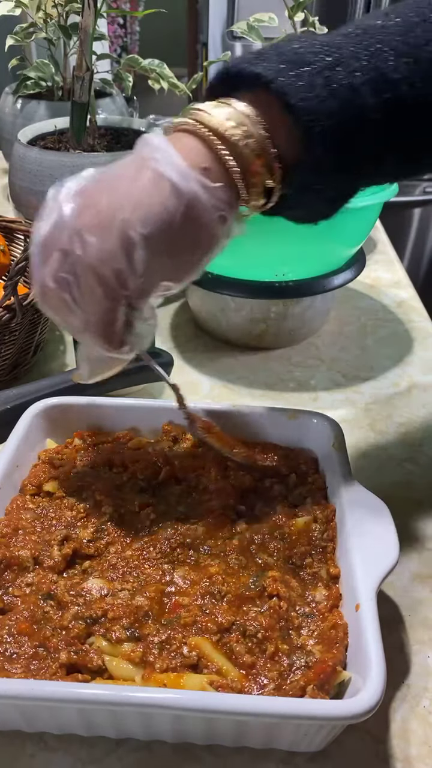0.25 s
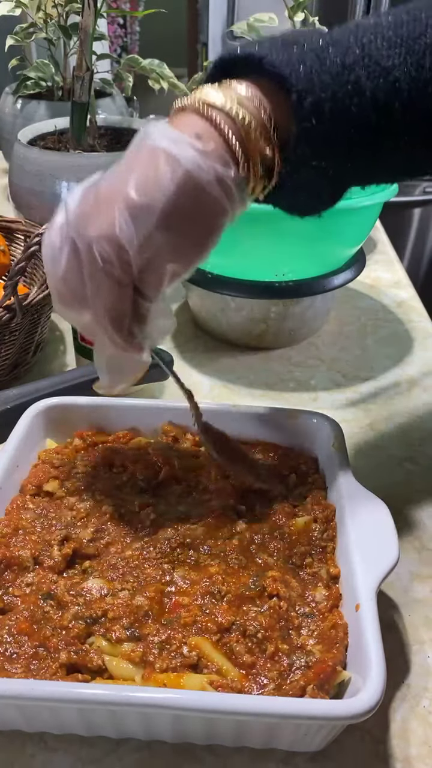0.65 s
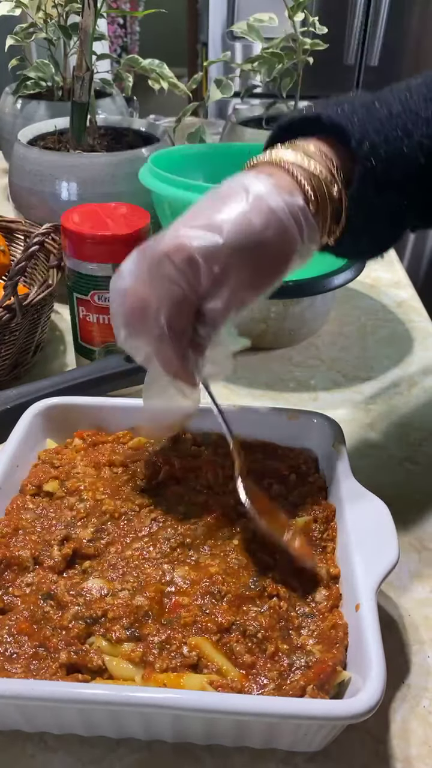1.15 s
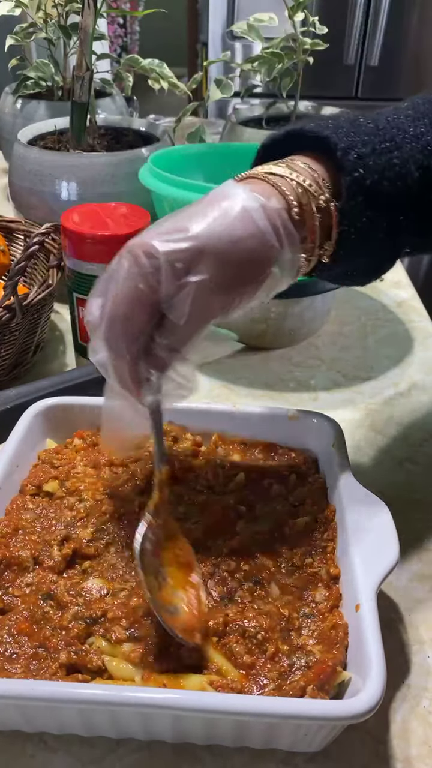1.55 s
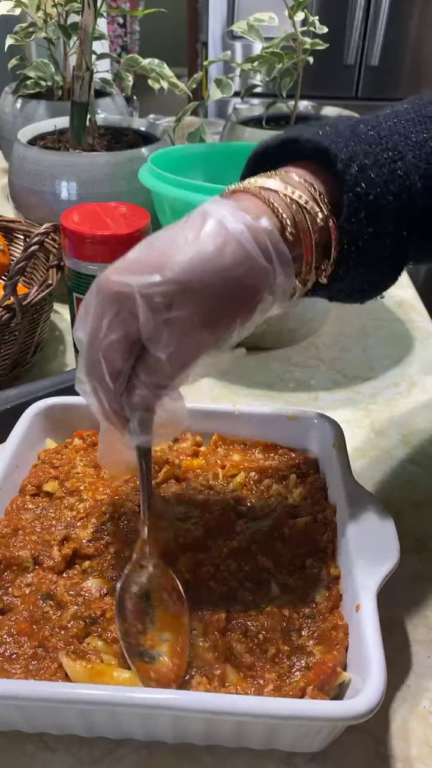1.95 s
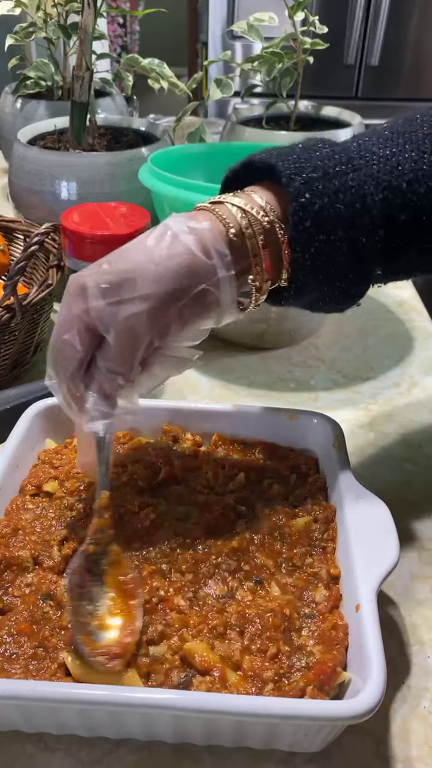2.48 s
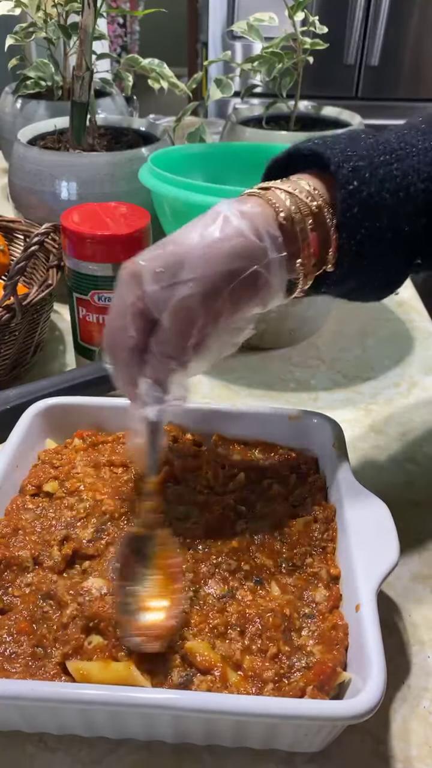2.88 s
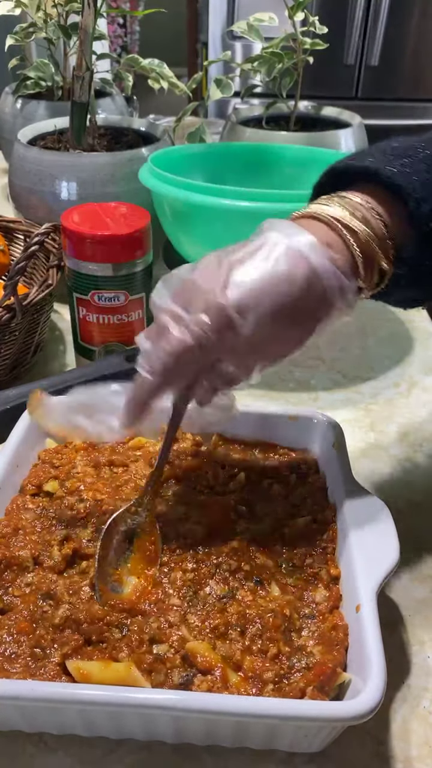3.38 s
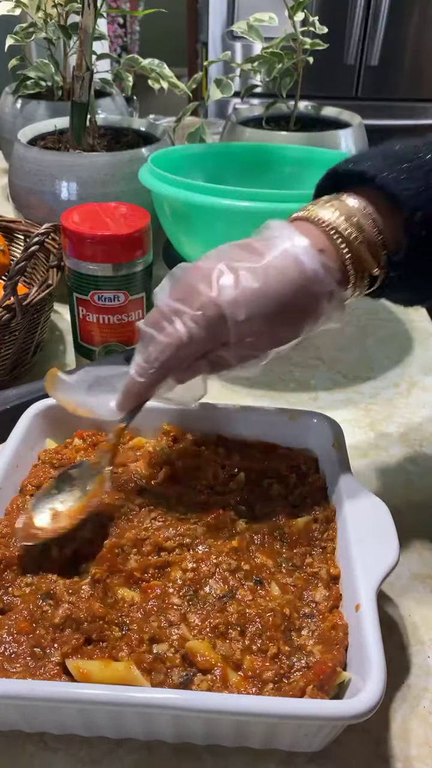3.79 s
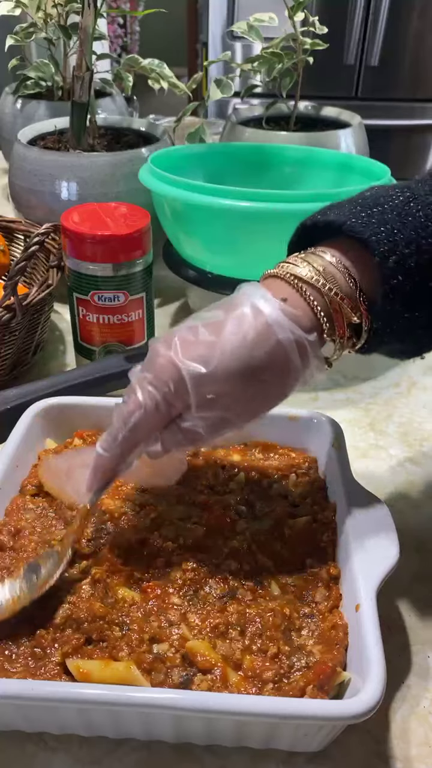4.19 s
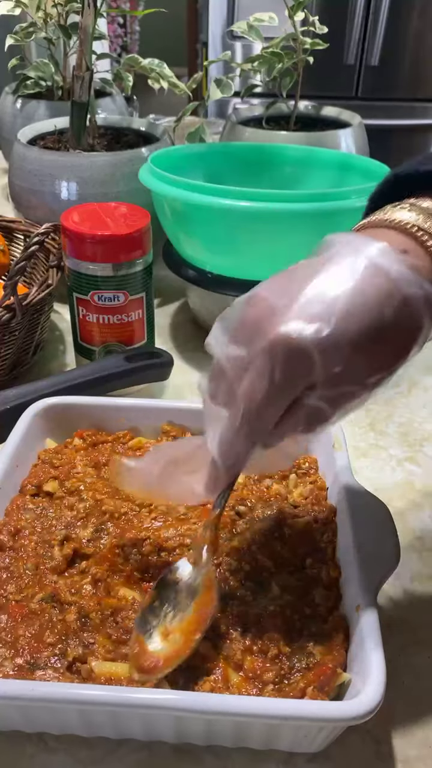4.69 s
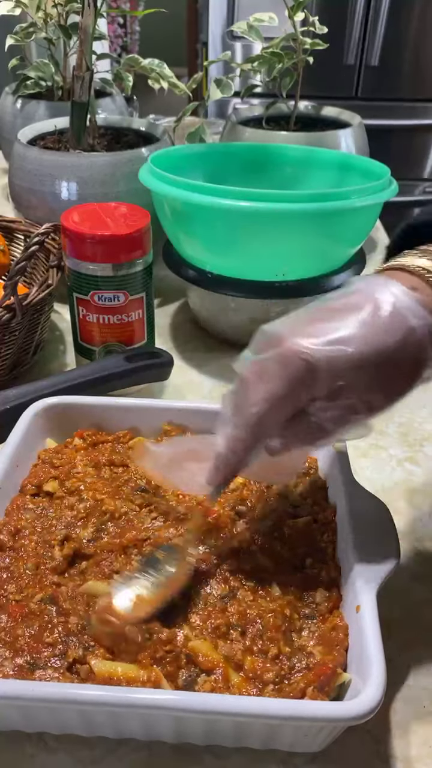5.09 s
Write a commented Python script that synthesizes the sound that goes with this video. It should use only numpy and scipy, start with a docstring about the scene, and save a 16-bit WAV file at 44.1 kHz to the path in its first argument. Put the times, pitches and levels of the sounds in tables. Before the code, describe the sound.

A metal spoon clinks on a ceramic dish, then pats thick sauce with soft dull thuds while a thin plastic glove rustles in a kitchen.

```python
"""A steel spoon spreads sauce in a ceramic dish on a counter, before one microphone in a small hard-walled kitchen.
Low room hush and mains hum run throughout. At once the spoon clinks on the rim, ringing the dish wall's modes,
and pats the filling: soft pushes thud dish and counter and the sauce murmurs after. Soon it grazes along the rim,
noise fed into the same modes. Then a thin plastic glove rustles, snaps over hiss, and sauce and glove tick in short
decaying sines. Pats go on almost to the end; a clink comes at 1.7 s, clinks and grazes again after 3.8 s."""
import sys
import numpy as np
from scipy import signal
from scipy.fft import rfft, irfft, next_fast_len
from scipy.io import wavfile
from scipy.ndimage import map_coordinates

SR = 44100
rng = np.random.default_rng(int(sys.argv[2]) if len(sys.argv) > 2 else 0)


def unload_audio(sound):
    """Save the sound as a 16-bit wav file, at the path given as the first command line argument."""
    columns = np.transpose(np.atleast_2d(sound))
    # keep every value between -1 and 1, then stretch to whole-number steps
    steps = np.round(np.clip(columns, -1, 1) * 32767)
    wavfile.write(sys.argv[1], SR, steps.astype(np.int16))


N = 235479  # samples in the scene
SPAN = 32768  # samples in one struck or grazed sound, before it is laid on the track


def amp(db):
    """dB to gain."""
    return 10 ** (np.asarray(db) / 20)


def unit(x):
    """Scaled to rms 1."""
    return x / np.sqrt(np.mean(x ** 2) + 1e-20)


def along(points, hz):
    """Values at hz, read between (Hz, value) points on a log frequency axis."""
    f, v = np.transpose(points)
    return np.interp(np.log(hz + 1), np.log(f + 1), v)


def filtered(x, response):
    """x times a complex response of frequency."""
    m = next_fast_len(len(x) + SR // 2)
    hz = np.fft.rfftfreq(m, 1 / SR)
    return irfft(rfft(x, m) * response(hz), m)[:len(x)]


def shaped(x, spectrum):
    """x filtered by a spectrum of (Hz, dB) points and scaled to rms 1."""
    return unit(filtered(x, lambda hz: amp(along(spectrum, hz))))


def body(modes, drive_db):
    """Response of a set of resonances in alternating sign, each driven at its own strength."""
    def response(f):
        total = 0
        for k, ((centre, width, db), drive) in enumerate(zip(modes, drive_db)):
            resonance = 1j * f * width / (centre * centre - f * f + 1j * f * width)
            total = total + (-1) ** k * amp(db + drive) * resonance
        return total
    return response


def wobble(rate):
    """A smooth random curve, rate knots a second."""
    knots = rng.standard_normal(int(N * rate / SR) + 4)
    return map_coordinates(knots, [np.arange(N) * rate / SR])


# How long the hard kitchen walls hold a sound. Each row: frequency in Hz, time to fall 60 dB in seconds.
KITCHEN_DECAY = [(100, 0.45), (300, 0.28), (1200, 0.35), (4000, 0.28), (12000, 0.23)]


def in_kitchen(x, wet_db):
    """x plus the walls' answer, which builds up in a few ms and dies at its own speed at each frequency."""
    hz, t, z = signal.stft(rng.standard_normal(SPAN), SR, nperseg=256)
    fall_db = -60 * t / along(KITCHEN_DECAY, hz)[:, None]
    tail = signal.istft(z * amp(fall_db), SR, nperseg=256)[1]
    tail *= 1 - np.exp(-np.arange(len(tail)) / SR / 0.0043)
    answer = signal.fftconvolve(x, tail / np.linalg.norm(tail))[:len(x)]
    return x + amp(wet_db) * answer


def add(track, s, db, sound):
    """Lays a sound on the track at s seconds, its level set over its first 20 ms."""
    start = round(s * SR)
    track[start:start + len(sound)] += amp(db) * sound / np.std(sound[:SR // 50])


# Spectrum of the empty room. Each row: frequency in Hz, relative density in dB per Hz.
ROOM_SPECTRUM = [(15, -62.5), (25, -32), (42, -6), (76, -5), (91, -4), (161, -5), (284, -14), (333, -14),
                 (461, -22.5), (513, -19), (572, -20.5), (1360, -29.5), (2660, -33), (15800, -45)]
# Mains hum. Each row: frequency in Hz, rms level in dB ahead of the microphone's bass loss.
MAINS_HUM = [(50, -69)]
HUSH_DB = -63  # ahead of the waver and the microphone


def hush():
    """The room's steady background is coloured noise, wavering a little, with mains hum as a sine."""
    t = np.arange(N) / SR
    hum = sum(amp(db) * np.sqrt(2) * np.sin(2 * np.pi * hz * t) for hz, db in MAINS_HUM)
    waver_db = 1.2 * wobble(3)
    return amp(HUSH_DB + waver_db) * shaped(rng.standard_normal(N), ROOM_SPECTRUM) + hum


# Resonances of the ceramic dish wall. Each row: frequency in Hz, width in Hz, strength in dB.
DISH_MODES = [(580, 22, 2), (1057, 36, 6), (1130, 42, 3), (1320, 40, -5.5), (1410, 50, -3.5),
              (1476, 50, -5), (1545, 60, -2.5), (1890, 50, -12), (1968, 45, -11), (2395, 40, -7.5),
              (2482, 50, -5.5), (3050, 80, -13), (3280, 40, -16.5), (3445, 60, -13.5), (3830, 70, -19),
              (4411, 70, -10), (4650, 80, -10), (4920, 88, -15), (5176, 47, -10.5), (5850, 140, -17.5),
              (6500, 50, -15), (7040, 90, -15), (7455, 60, -18), (7800, 70, -21), (8050, 50, -26),
              (8590, 72, -26.5), (9070, 45, -24), (10380, 260, -38), (12720, 90, -17), (15500, 150, -33)]
DISH_HZ = np.transpose(DISH_MODES)[0]
# Spoon on rim. Each row: start in seconds, level in dB over the first 20 ms.
RIM_CLINKS = [(.040, -26), (1.675, -26.5), (3.887, -26), (4.459, -41)]
# Frequencies in Hz near which the struck spot matters.
SPOT_PITCHES = [570, 1060, 1125, 1305, 1410, 1540, 1930, 2450, 3040, 4500, 5200, 7000, 9000, 12770]
# The spot of the rim under each clink. Each row: one drive in dB for each of SPOT_PITCHES.
RIM_SPOTS = [(-8, -5.5, -3, 2.5, 2.5, 4, -12.5, 2.2, 10.8, 4.9, 7, 3.5, 2.5, 3.5),
             (-13, -6, 0.6, 0, -4, 4.5, -4.8, -5, 6.5, 0.95, -10, -0.5, -2, -18),
             (-3.5, -22, 6.5, 9, 5.5, -3, 11, 9, 12.5, 5, 5, 10.5, 7, 6.5),
             (-17, -9, -6, -9.5, 3, 9.5, -2, -11.5, 2.5, 2.9, -1.5, -9.5, -8, -12)]
CHATTER_S = 0.007  # decay time of the edge's chatter


def wall_drive(spot):
    """How hard one spot of the rim drives each wall mode, in dB."""
    return along(list(zip(SPOT_PITCHES, spot)), DISH_HZ)


def clinks():
    """Steel on glaze: the edge chatters for a few ms, with a short crack and the wall's modes."""
    track, t = np.zeros(N + SPAN), np.arange(SPAN) / SR
    # broad resonances, falling 5 dB an octave
    crack_modes = [(hz, 0.66 * hz, -5 * np.log2(hz / 1000)) for hz in SPOT_PITCHES[:-1]]
    for (s, db), spot in zip(RIM_CLINKS, RIM_SPOTS):
        drive_db = wall_drive(spot) + rng.normal(0, 0.47, len(DISH_MODES))
        chatter = 0.13 * rng.standard_normal(SPAN) * np.exp(-t / CHATTER_S)
        blow = (t == 0) + chatter
        ring = unit(filtered(blow, body(DISH_MODES, drive_db)))
        crack = unit(filtered(blow, body(crack_modes, spot)))
        add(track, s, db, in_kitchen(ring + amp(-7) * crack, wet_db=-2))
    return track[:N]


# Resonances of dish and counter together. Each row: frequency in Hz, width in Hz, strength in dB.
COUNTER_MODES = [(232, 25, -0.5), (315.9, 17, 4), (435, 7.3, -19.5), (505.7, 24, -9), (573.1, 33, 1),
                 (655, 16, -19.5), (748, 29, -10.5), (948, 88, -7), (1008, 130, -8), (1242, 120, -17),
                 (1452, 80, -13), (1790, 110, -38)]
# Low room modes that swell up late under each pat. Each row: frequency in Hz, width in Hz, strength in dB.
ROOM_BOOM_MODES = [(75, 10, -15), (101, 32, -7), (167.7, 17, 0.5)]
# Spoon on filling. Each row: start in seconds, level in dB over the first 20 ms, contact time scale in ms,
# then in dB: boom, extra drive of the ring under 380 Hz, knock, slap.
SPOON_PATS = [(0.045, -37.5, 0.51, -13.5, -7.5, -3, 0), (1.248, -41, 0.43, 0.5, -6, -2.5, -24.5),
              (1.322, -40, 0.43, -18, 1, -1, -30), (1.696, -36.5, 0.41, -1.5, 6, -2, -5),
              (1.947, -35, 0.21, -13.5, 3.5, 0.5, -35), (2.233, -38.5, 0.26, -1.5, 0.5, -3, -21.5),
              (2.645, -37, 0.26, 3.5, -1.5, 2.5, -16.5), (2.760, -40.5, 0.37, -9, 0.5, 1.5, -39),
              (3.045, -38, 0.29, -14, 5, -2, -22.5), (3.893, -47, 0.39, -11, 26, -7.5, -24),
              (4.313, -49.5, 0.33, 3, 0, 1, -23), (4.412, -60, 0.4, 3, 3, 5, -25),
              (4.459, -53, 0.24, 2.5, -4, 0.5, -17), (4.699, -33, 0.14, -13.5, 5, 1.5, -34),
              (5.071, -40, 0.4, 0, 0, -2.5, -23.5), (5.326, -45, 0.78, -12, 14, 2, -27)]
KNOCK_HZ, KNOCK_LAG_MS = 417, 2.126


def pats():
    """A soft push through the filling: the longer the contact, the duller the thud."""
    track, t = np.zeros(N + SPAN), np.arange(SPAN) / SR
    for s, db, contact_ms, boom_db, low_db, knock_db, slap_db in SPOON_PATS:
        u = t / (max(contact_ms, .1) / 1000) * np.pi
        push = u * u * np.exp(-u)
        is_low = np.transpose(COUNTER_MODES)[0] < 380
        drive_db = low_db * is_low + rng.normal(0, 1, len(COUNTER_MODES))
        ring = unit(filtered(push, body(COUNTER_MODES, drive_db)))

        boom = filtered(push, body(ROOM_BOOM_MODES, [0] * len(ROOM_BOOM_MODES)))
        boom = unit(boom * (1 - np.exp(-(t / 0.016) ** 2)))  # swings up late

        knock = unit(filtered(push, lambda f: body([(KNOCK_HZ, 210, 0)], [0])(f) ** 2))
        # the bowl bottoms out just after it sinks in
        knock = np.roll(knock, round(KNOCK_LAG_MS * SR / 1000))

        slap = rng.standard_normal(SPAN) * amp(-60 * t / 0.068)  # the wet surface smacks
        slap = unit(filtered(slap, lambda f: body([(1200, 1800, 0)], [0])(f) ** 3))

        struck = amp(knock_db) * in_kitchen(knock, wet_db=-1)
        struck += amp(slap_db) * in_kitchen(slap, wet_db=3.5)
        thud = in_kitchen(ring + amp(boom_db) * boom, wet_db=2.0)
        add(track, s, db, struck + thud)
    return track[:N]


# The murmur peaks SETTLE_S after a pat, SETTLE_DB against its level; STIR_DB is the floor between pats.
SETTLE_S, SETTLE_DB, STIR_DB = 0.058, -24, -81.5


def smear():
    """A dull murmur of low noise: the sauce settles after every pat."""
    t = np.arange(N) / SR
    level = amp(STIR_DB)
    for s, db, *_ in SPOON_PATS:
        u = np.clip(t - s, 0, None) / SETTLE_S
        level = level + amp(db + SETTLE_DB) * u * np.exp(1 - u)
    murmur = unit(filtered(rng.standard_normal(N), lambda f: body([(350, 500, 0)], [0])(f) ** 2))
    return level * amp(1.0 * wobble(8)) * murmur


# The spoon edge grazes the rim. Each row: start in seconds, swell in seconds, hold in seconds, level in dB
# ahead of the stroke's shape, favoured pitch in Hz, fall-off of the drive around it in dB per octave.
RIM_GRAZES = [(0.19, 0.034, 0.034, -51.5, 1186, 11.5), (4.04, 0.0071, 0.014, -54.5, 1470, 5),
              (4.491, 0.016, 0.017, -50, 1530, 4)]


def drag():
    """Sliding steel feeds grit, as noise, into the same wall modes, mostly those near one pitch."""
    track, t = np.zeros(N + SPAN), np.arange(SPAN) / SR
    clink_s = np.transpose(RIM_CLINKS)[0]
    for s, swell, hold, db, hz, slope_db in RIM_GRAZES:
        spot = RIM_SPOTS[np.argmin(abs(clink_s - s))]  # where the nearest clink lands
        drive_db = wall_drive(spot) - slope_db * abs(np.log2(DISH_HZ / hz))
        grit = filtered(rng.standard_normal(SPAN), body(DISH_MODES, drive_db))
        stroke = np.interp(t, [0, swell, swell + hold, swell + 2.3 * hold], [0, 1, 1, 0])
        graze = in_kitchen(amp(db) * unit(grit) * stroke, wet_db=-0.5)
        track[round(s * SR):][:SPAN] += graze
    return track[:N]


# Body of the film's rustle. Each row: frequency in Hz, relative density in dB per Hz.
FILM_SPECTRUM = [(410, -23), (700, 5.5), (894, -11), (1050, -1.5), (1600, -7), (2150, -6), (8000, -10),
                 (10400, -39), (17600, -120)]
# Bright part of the rustle. Each row: frequency in Hz, relative density in dB per Hz.
SHEEN_SPECTRUM = [(4710, -19.5), (8000, -16.5), (10200, -10), (14400, -10.5), (15800, -2)]
# Movements of the glove. Each row: peak in seconds, peak level in dB ahead of the mix and the walls,
# swell in seconds, fade in seconds (both over 20 dB), brightness in dB.
GLOVE_RUSTLES = [(.588, -79, .015, .12, -11.5), (.89, -72.5, 0.24, 0.12, -10),
                 (.982, -63, 0.01, 0.033, -12.5), (1.172, -74.5, .03, 0.33, -2.5),
                 (1.41, -62, 0.029, 0.12, -14.5), (1.39, -69.5, 0.12, 0.9, -31.5),
                 (2.299, -75, 0.14, 0.65, -16), (2.468, -72.5, .03, .35, -15),
                 (2.606, -67.5, .03, 0.066, -29.5), (2.655, -70, .04, .2, -20),
                 (2.89, -76.5, 0.11, .05, -12.5), (2.948, -67.5, .04, 0.16, -26),
                 (3.165, -64, 0.24, .07, -6), (3.298, -62, 0.13, 0.11, -5.5), (3.36, -61, 0.077, 0.27, -9),
                 (3.44, -67, 0.065, 0.33, -22), (3.61, -68, 0.062, 0.48, -46.5),
                 (3.78, -71, 0.048, 0.054, -26), (4.33, -72, 0.19, 0.091, -25),
                 (4.44, -70, 0.051, 0.6, -14), (4.751, -82, 0.19, 0.86, -21),
                 (5.22, -69.5, 0.24, 0.068, -10), (5.26, -69.5, .03, 0.22, -19)]


def glove():
    """Creasing film: tiny snaps of a few cycles, each at its own pitch and size, over a hiss."""
    s, db, swell, fade, bright_db = np.transpose(GLOVE_RUSTLES)[..., None]
    t, life = np.arange(N) / SR, np.arange(256) / SR
    when, pitch, size = rng.random((3, 2500, 1))
    hz = 1500 * amp(18 * pitch)
    strength = amp(12.3 * size ** 3) * np.sqrt(hz)
    snaps = strength * np.sin(2 * np.pi * hz * life) * np.exp(-life * hz / 2.2)
    at = (when * N).astype(int) + np.arange(256)
    crackle = np.bincount(at.ravel(), snaps.ravel(), N + 256)[:N]
    grain = unit(rng.standard_normal(N) + .75 * unit(crackle)) * amp(2.2 * wobble(35))

    level = amp(db - 20 * np.maximum((s - t) / swell, (t - s) / fade))
    # the rustles add in power
    film = np.linalg.norm(level, axis=0) * shaped(grain, FILM_SPECTRUM)
    sheen = np.linalg.norm(level * amp(bright_db), axis=0) * shaped(grain, SHEEN_SPECTRUM)
    return in_kitchen(amp(-3.0) * film + sheen, wet_db=-6)


# Ticks of sauce and glove. Each row: start in seconds, level in dB over the first 20 ms, pitch in Hz.
WET_TICKS = [(0.5771, -84, 2330), (0.8129, -79, 3570), (0.981, -73, 2700), (0.9916, -74, 4800),
             (1.103, -77, 2520), (1.172, -78, 3980), (1.4055, -68.5, 11900), (1.4116, -64.5, 6800),
             (2.4704, -74.5, 4050), (2.6039, -69, 4280), (2.9442, -70.5, 2480), (3.0595, -72, 6000),
             (3.091, -75, 2400), (3.1325, -69, 2520), (3.169, -70, 2410), (3.293, -67.5, 4670),
             (3.302, -65.5, 2330), (3.37, -70, 2380), (3.5924, -66.5, 2560), (3.663, -86, 5560),
             (4.1565, -70.5, 6260), (5.1846, -76, 2570), (5.2597, -78, 3660)]


def ticks():
    """Each tick is a few cycles at its own pitch with a short burst of noise as its sharp edge."""
    track, t = np.zeros(N + SPAN), np.arange(SPAN) / SR
    for s, db, hz in WET_TICKS:
        cycles = np.sin(2 * np.pi * hz * t) * np.exp(-t * hz / 2.8)
        edge = 0.15 * rng.standard_normal(SPAN) * np.exp(-t / 0.0017)
        add(track, s, db, in_kitchen(cycles + edge, wet_db=-1.5))
    return track[:N]


def scene():
    """All sources at one microphone."""
    spoon = clinks() + drag() + pats()
    return (spoon + smear() + glove() + ticks() + hush())[None]


TOP_HZ = 15800  # band limit


def record(dry):
    """The microphone loses the deep bass; nothing is kept above the band limit."""
    def microphone(hz):
        bass_loss = (1j * hz / (48 + 1j * hz)) ** 3
        return bass_loss * (hz < TOP_HZ)
    return filtered(dry[0], microphone)[None]


dry = scene()
out = record(dry)
unload_audio(out)
```